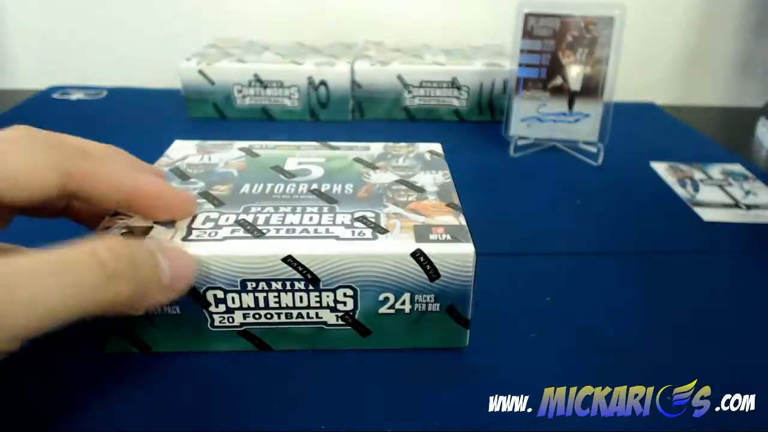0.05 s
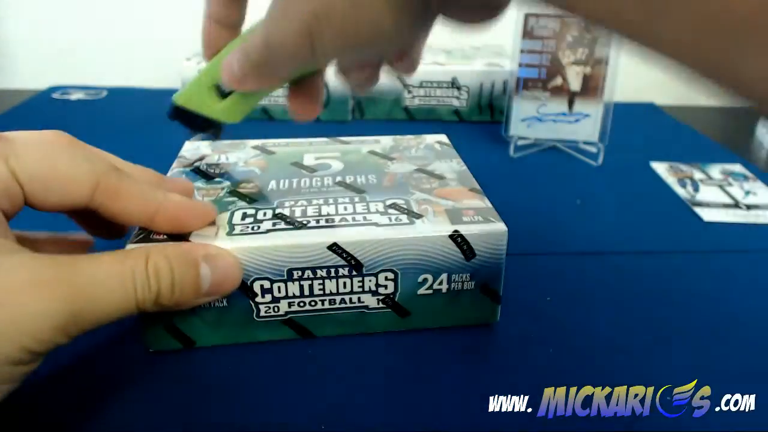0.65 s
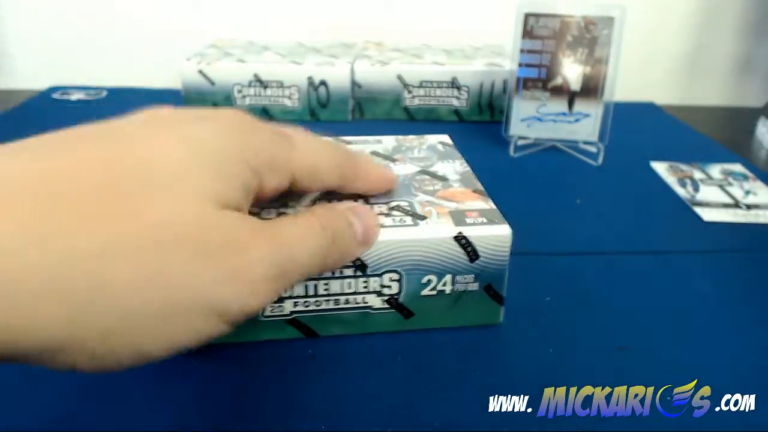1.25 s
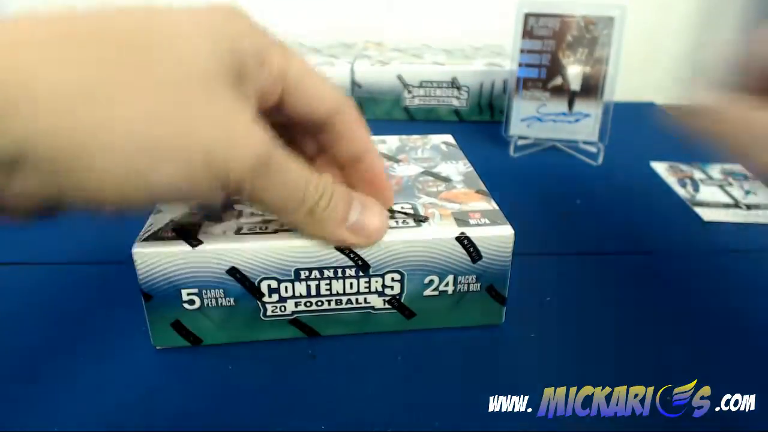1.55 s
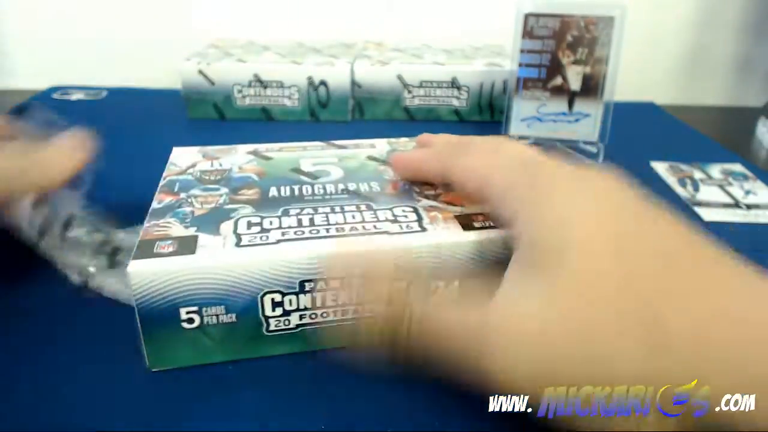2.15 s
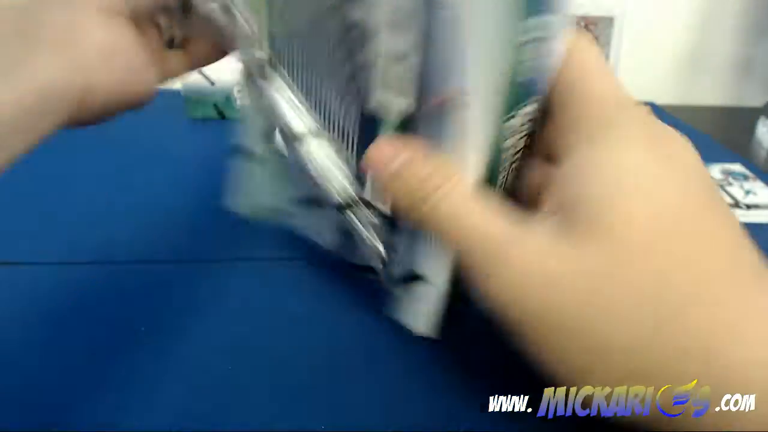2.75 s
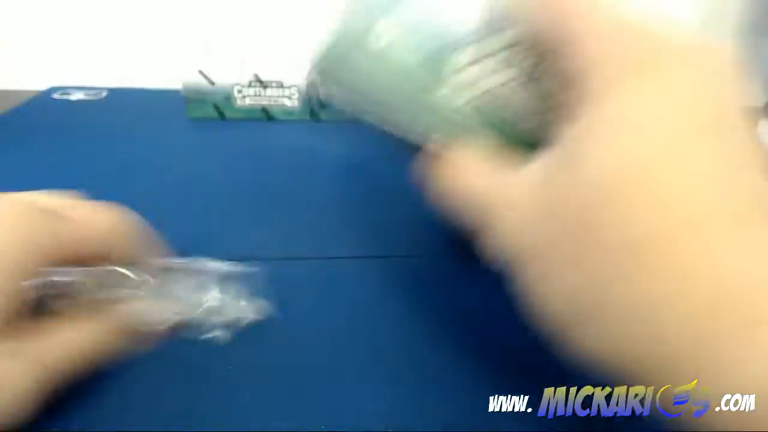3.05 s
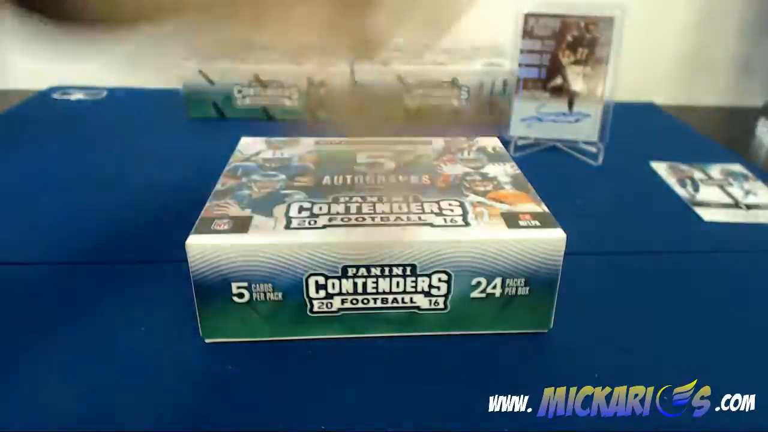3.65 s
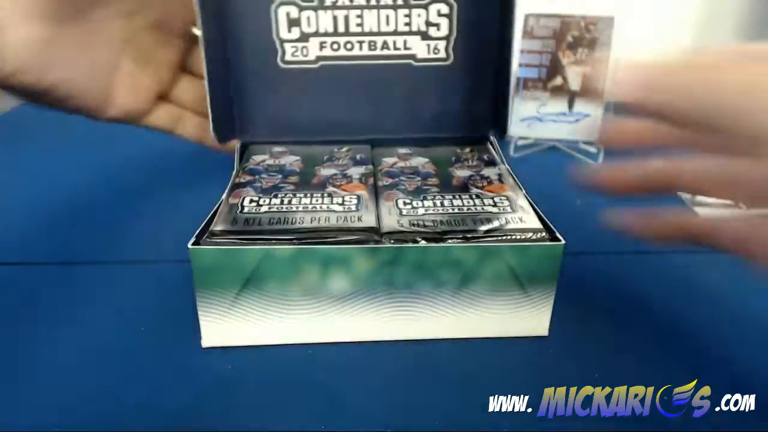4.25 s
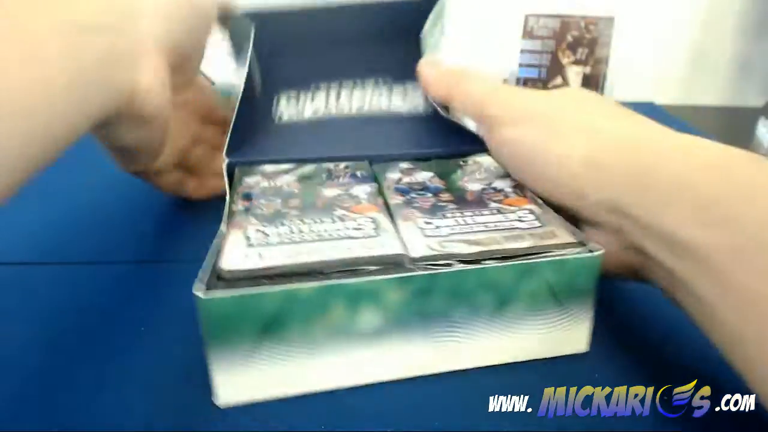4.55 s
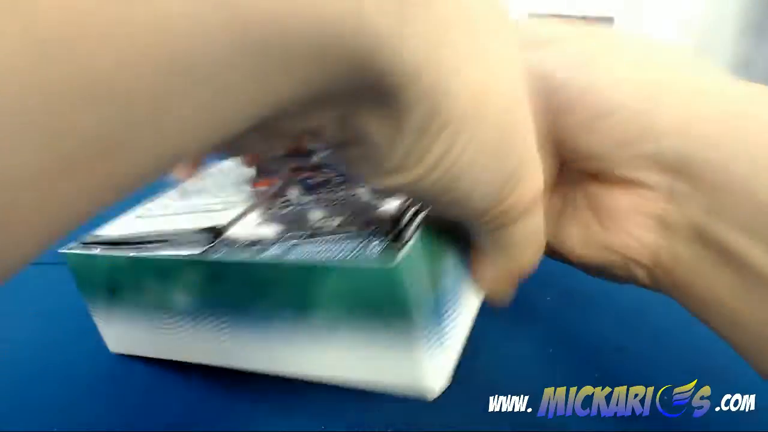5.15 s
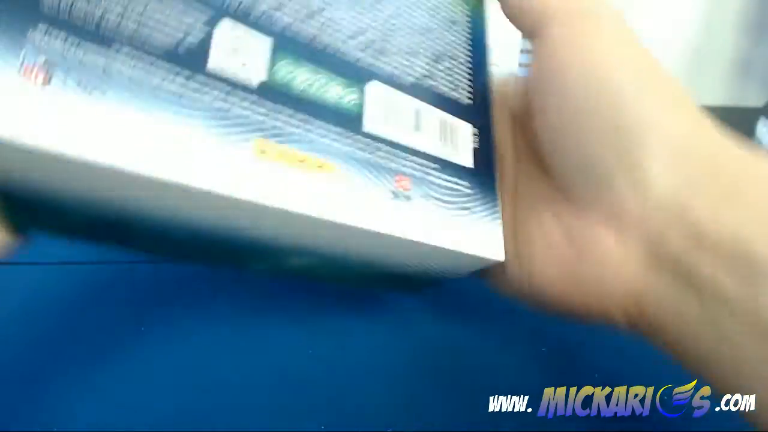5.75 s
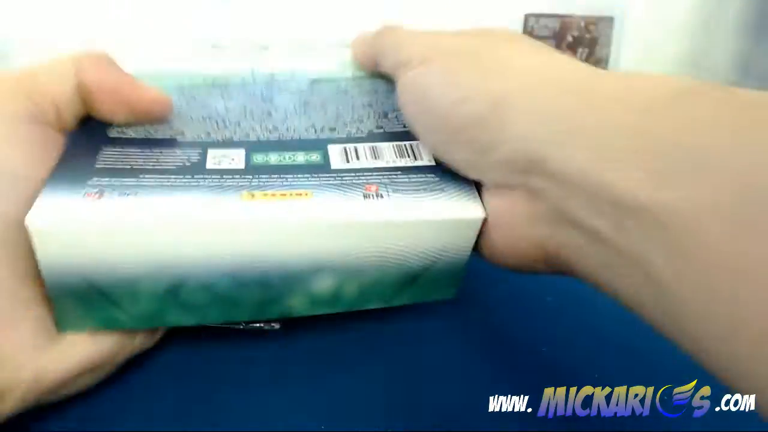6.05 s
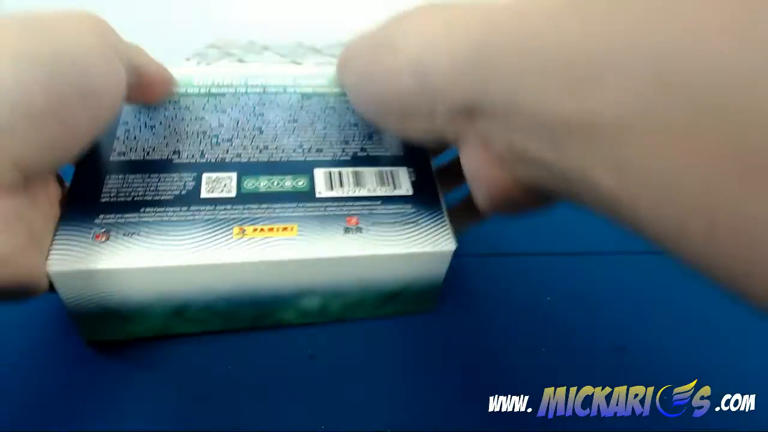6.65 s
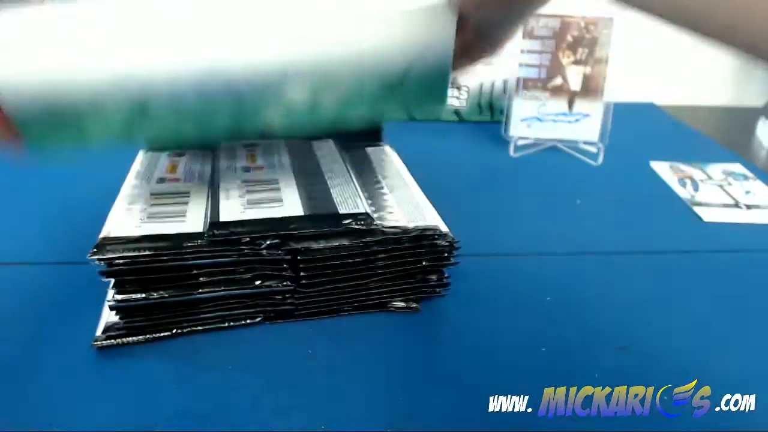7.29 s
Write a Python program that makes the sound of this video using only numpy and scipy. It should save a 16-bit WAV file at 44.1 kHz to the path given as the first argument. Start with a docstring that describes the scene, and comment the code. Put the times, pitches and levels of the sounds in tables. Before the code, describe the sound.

Hands shift on a table with low rumbles and light taps on a cardboard box. At about 0.5 seconds a cutter rasps briefly through plastic film, ending in a snap. Sharp knocks on the box follow around 1.2 to 1.4 seconds. From 1.6 to 3.4 seconds the film peels off in bright crinkles and snaps, with a deep table thump at 2.5. At about 3.2 the box drops flat with a boom, the loudest sound. The lid flaps open at 4.2 and bumps a few more times until 4.9. Foil packs then rustle and tick over low judders of handling. From 5.9 to about 7.4 seconds they slide out, scraping the cardboard and knocking hollow tones from the carton, growing lighter toward the end. The sound is mono, in a small room with little echo and a faint low background.

```python
"""A cloth-covered table in a small room, where a shrink-wrapped cardboard box is opened by a mono mic.
A cutter rasps through the film, fingers knock on the box and peel the film off in crackles and snaps,
and the box drops flat with a boom. The lid flips open and rings, the box is turned over and lifted,
and its foil packs slide out, scraping and bumping the hollow carton. Film and foil sound through
countless tiny slips and buckles; underneath, the table thumps and rumbles with the moving hands."""
import sys
import numpy as np
from scipy import signal
from scipy.fft import rfft, irfft, next_fast_len
from scipy.io import wavfile
from scipy.ndimage import uniform_filter1d

SR = 44100
rng = np.random.default_rng(int(sys.argv[2]) if len(sys.argv) > 2 else 0)


def bounce(signal):
    """Save signal as a 16-bit WAV file at the path given by the first command-line argument."""
    frames = np.transpose(np.atleast_2d(signal))
    limited = np.clip(frames, -1, 1)
    pcm = np.round(limited * 32767).astype(np.int16)
    wavfile.write(sys.argv[1], SR, pcm)


N = 331713
ROOM_TONE_DB, ROOM_SEND_DB, ROOM_T60_S = -56, -14.5, 0.22
ARM_ATTACK_S, ARM_RELEASE_T60_S = 0.011, 0.35
PULL_ATTACK_S, PULL_RELEASE_T60_S = 0.014, 0.16
SLIDE_ATTACK_S, SLIDE_RELEASE_T60_S = 0.012, 0.18
LOW_CUT_HZ, HIGH_CUT_HZ = 26, 16100

# EQ curves that give each layer its colour: frequency_hz, gain_db
ROOM_TONE_EQ = [(15, -18.5), (25, 8), (47, -5.5), (102, -13), (373, -27), (503, -25.5), (591, -27.5),
                (863, -31), (3720, -37), (5000, -38), (9840, -41), (15800, -45)]
RUMBLE_EQ = [(25, -5.5), (45, -2.5), (80, -10), (110, -9), (140, -11.5), (175, -8), (240, -17),
             (330, -20.5)]
KNOCK_EQ = [(300, -2), (700, 0), (2500, 0), (3200, -5), (4500, -4), (9000, -9), (16000, -18)]
SLIT_EQ = [(400, 3.5), (800, 3.5), (1250, 6.5), (2000, 2.5), (3000, -0.5), (6000, -8.5), (10000, -13),
           (16000, -24)]
FILM_EQ = [(400, 4.5), (1500, 1), (3500, -1), (6000, 1.5), (8000, 2), (11000, -1.5), (16000, -11)]
FOIL_EQ = [(1200, 2), (2000, -0.5), (4000, -5), (6000, -2.5), (8500, -6), (11000, -11), (16000, -21.5)]
REVERB_EQ = [(100, -14), (300, 1.5), (2500, -3.5), (8000, -6), (16000, -3.5)]
SETTLE_EQ = [(200, -2.5), (450, -12.5), (1200, -2.5), (3000, -16), (16000, -34)]
# Ringing modes of the table, of box and table together, and of the open lid: pitch_hz, gain_db, t60_s
SWAY_MODES = [(40, 4, 0.51), (50, 3.5, 0.32), (68, -3.5, 0.29)]
BOOM_MODES = [(109, 3, 0.11), (132, -22, 0.37), (171.3, -1, 0.24), (242.2, -3, 0.18), (287, -10, 0.13)]
LANDING_MODES = [(91, -7.5, 0.3), (110, 3, 0.2), (172, 3, 0.19), (200, 8, 0.078), (231, 2, 0.13),
                 (376, -8, 0.049), (456, -19, 0.036), (747, -7, 0.047), (1100, -23, 0.074)]
LID_MODES = [(182, -29, .2), (306, -7, 0.089), (480, -4.5, 0.074), (669, -4, 0.078), (977, -4.5, 0.041),
             (1036, -8, 0.085), (1400, -3.5, 0.051), (1670, 1, 0.023), (1830, 1.5, 0.028),
             (3150, -10, 0.036)]
# Resonances of the box, packed and hollow: centre_hz, width_hz, gain_db
FULL_BOX = [(515, 70, -3), (755, 55, 3), (1080, 100, 0), (1360, 100, 1), (2040, 260, 1), (2400, 280, 2),
            (2750, 200, -2), (3570, 120, -4), (5400, 500, -6)]
HOLLOW_BOX = [(258, 24, 2.5), (454, 13.5, 0.5), (516, 18.6, 3), (653, 45, 1.5), (760, 44, -2), (840, 57, 0),
              (1036, 40, -3.5)]
# Texture of the slips and buckles in each thin sheet: per_s, spread_db, grain_t60 (in s), bed (a gain)
FILM_GRAIN = dict(per_s=750, spread_db=5, grain_t60=.004, bed=.55)
FOIL_GRAIN = dict(per_s=1100, spread_db=4.5, grain_t60=.005, bed=.65)

# A hand or arm shifts on the table: start_s, length_s, rumble_db, drone_db
ARM_MOVES = [(0, 0.043, -42, -48.5), (.45, 0.36, -52, -56.5), (.81, 0.12, -48.5, -65),
             (1.11, 0.38, -45.5, -56.5), (1.5, 0.092, -44, -49.5), (1.63, 0.31, -48, -51.5),
             (1.96, 0.27, -48.5, -59), (2.24, 0.67, -47, -62), (2.55, 0.1, -35, -62),
             (2.92, 0.12, -31.5, -47), (3.33, 0.18, -42.5, -60.5), (3.55, 0.6, -55.5, -71.5),
             (4.05, 0.4, -46, -57), (4.5, 0.36, -56, -69.5), (4.8, 0.44, -41, -60.5),
             (5.15, 0.45, -46, -56.5), (5.87, 0.19, -44, -54), (6.15, .7, -55.5, -62),
             (6.38, 0.15, -42.5, -58), (7.28, 0.27, -58, -72)]
# Soft blows that reach the table: start_s, sway_db, boom_db
THUMPS = [(0.005, -39, -45), (0.461, -38.5, -54), (0.802, -41, -48.5), (1.198, -45, -37.5),
          (1.225, -44, -33.5), (1.327, -44, -26.5), (1.974, -52, -50.5), (2.028, -42, -47.5),
          (2.151, -35, -47.5), (2.493, -18, -30.5), (2.925, -32, -47), (3.077, -54, -42.5),
          (3.1504, -10.5, -42), (4.217, -37, -40), (4.796, -37, -43), (5.506, -30.5, -49.5),
          (5.873, -38, -39), (6.376, -38, -52), (6.475, -51, -52)]
# Dragged skin and cardboard stick and slip: start_s, length_s, pitch_hz, level_db
JUDDERS = [(1.123, 0.073, 50, -31), (1.269, 0.06, 172, -26.5), (2.201, 0.045, 40, -30),
           (4.925, 0.073, 54, -30), (5.002, 0.077, 45.4, -22.5), (5.066, 0.081, 50, -32),
           (5.212, 0.07, 43.4, -34), (5.516, 0.059, 43.3, -30), (6.404, 0.036, 55, -34),
           (6.487, 0.061, 61, -36)]
# Scrapes, and the box ringing on after knocks and bumps: start_s, length_s, centre_hz, width_hz, level_db
SWELLS = [(.0, 0.029, 2000, 503, -57.5), (.0, 0.052, 260, 70, -52.5), (.11, 0.024, 2200, 700, -58),
          (1.249, 0.094, 560, 300, -54.5), (1.34, .06, 550, 300, -48), (2.178, 0.032, 750, 700, -54),
          (2.935, 0.055, 188, 80, -43),  (0.571, 0.093, 1300, 330, -52), (0.582, 0.1, 1690, 300, -54),
          (0.63, 0.19, 523, 150, -54.5), (0.922, .09, 3600, 1800, -70.5), (4.25, 0.13, 1530, 600, -64.5),
          (4.398, 0.043, 1590, 400, -55.5), (4.93, 0.049, 1830, 900, -63), (4.793, 0.036, 493, 110, -41.5),
          (5.04, 0.11, 376, 60, -53.5), (5.06, .07, 2100, 500, -59), (5.05, 0.087, 207, 80, -55),
          (6.063, 0.074, 258, 60, -44.5), (5.19, 0.029, 400, 60, -50.5), (5.856, .08, 261, 70, -43.5),
          (5.96, 0.14, 1400, 400, -48), (6.207, 0.12, 880, 200, -53), (6.544, 0.062, 570, 250, -51),
          (6.702, 0.077, 4930, 600, -52.5), (6.767, 0.11, 785, 250, -49.5), (6.983, 0.18, 810, 347, -67.5),
          (7.329, 0.019, 990, 200, -52)]
# Knocks on cardboard: start_s, body_db, bite_db, crack_db
KNOCKS = [(0.054, -68, -61, -70), (0.1217, -83, -51, -64), (0.18, -89, -71, -71), (0.393, -78, -69, -72),
          (0.4634, -57, -50.5, -46.5), (1.1967, -48, -37.5, -49.5), (1.2224, -39.5, -30, -43),
          (1.3247, -26.5, -21.5, -32), (1.3512, -39.5, -39.5, -50), (1.4938, -51, -56, -72),
          (1.644, -55, -57, -72), (2.492, -46, -45, -48.5), (3.0782, -42.5, -59, -48),
          (3.1503, -31.5, -32, -38), (3.3498, -55, -58, -58), (3.417, -61.5, -71, -70),
          (4.2166, -36, -40.5, -53.5), (4.3168, -53, -58, -67), (4.4124, -53, -53, -55.5),
          (4.797, -42.5, -44.5, -47), (4.861, -49, -44, -54.5), (5.451, -57, -69, -72),
          (5.5677, -44, -38, -37), (5.5767, -45.5, -42.5, -45), (6.0739, -37, -41.5, -55),
          (6.1162, -41, -39.5, -42)]
# The box lands on one edge, then falls flat: start_s, gain_db
LANDING_HITS = [(3.1501, -21), (3.1613, -19.5)]
# The lid flaps open and bumps against its hinge: start_s, gain_db
LID_FLAPS = [(4.2177, -33.5), (4.3163, -50), (4.433, -49), (4.797, -57), (4.861, -47.5)]
# Packs bump the carton, each waking one hollow tone: start_s, knock_db, pitch_hz, ring_db
PACK_BUMPS = [(5.874, -48.5, 258, -29.5), (5.908, -45.5, 537, -32), (5.922, -56, 258, -31),
              (6.074, -47, 645, -31), (6.098, -43.5, 735, -42), (6.213, -53, 760, -42),
              (6.279, -53, 723, -39), (6.376, -57.5, 277, -52.5), (6.546, -60, 633, -37.5),
              (6.594, -57, 529, -37), (6.78, -58, 523, -43.5), (6.954, -52, 546, -40),
              (7.162, -55, 738, -48), (7.331, -45, 543, -38)]
# Packs slide on foil and cardboard: start_s, length_s, rustle_db, sizzle_db, carton_rub_db
PACK_SLIDES = [(3.75, .22, -65, -67, -64.5), (4.03, 0.18, -72, -73, -66.5), (4.25, 0.14, -70, -66.5, -67),
               (4.53, 0.05, -62.5, -67, -61.5), (4.64, 0.21, -65.5, -70, -71.5),
               (4.81, 0.051, -60, -60, -78), (4.9, 0.097, -63, -66.5, -66), (5.005, 0.11, -54, -56, -56.5),
               (5.15, 0.15, -57, -57.5, -59.5), (5.33, 0.23, -64, -66, -62), (5.645, 0.029, -70, -71, -63),
               (5.8, .07, -67.5, -70.5, -64), (5.868, 0.072, -50.5, -52.5, -43.5),
               (5.945, 0.17, -50, -51, -48.5), (6.14, 0.1, -57.5, -62, -63),
               (6.21, 0.08, -53.5, -54.5, -55), (6.35, 0.023, -56.5, -58.5, -58),
               (6.435, 0.057, -57, -57.5, -52), (6.53, 0.082, -56.5, -54.5, -47.5),
               (6.62, 0.23, -55.5, -53, -52), (6.865, 0.26, -72.5, -69, -62), (7.16, 0.014, -62, -69, -47),
               (7.25, 0.098, -61, -61, -61), (7.41, 0.05, -68.5, -68, -64)]
# Level curve of the cutter running through the film: time_s, rasp_db, hiss_db
SLIT_CURVE = [(0.533, -86, -93), (0.565, -61, -56.5), (0.605, -54, -58), (0.676, -53.5, -51),
              (0.748, -47, -49.5), (0.804, -61, -47.5), (0.836, -81, -87), (0.868, -84, -78)]
# Pulls and squeezes of the film: start_s, length_s, rustle_db, sizzle_db
FILM_PULLS = [(1.64, 0.081, -58, -54.5), (1.71, 0.21, -51, -46), (1.955, 0.021, -52, -50.5),
              (2.015, 0.15, -63, -59.5), (2.125, 0.084, -58, -60), (2.26, .23, -63, -58),
              (2.485, .15, -58, -53), (2.635, 0.17, -54, -49), (2.805, 0.12, -61, -56),
              (2.9, 0.12, -54, -50.5), (3.045, 0.05, -56.5, -56.5), (3.19, 0.089, -62, -62.5),
              (3.255, 0.091, -55, -48), (3.36, 0.058, -75, -66.5), (3.46, 0.29, -68.5, -68)]
# The sharpest creases of film or foil snap: start_s, middle_db, treble_db
SNAPS = [(0.7998, -51, -41.5), (1.1194, -58, -66), (1.242, -47, -46.5), (1.5547, -62.5, -56),
         (1.577, -72, -61), (1.6083, -64, -58.5), (1.6608, -60, -51), (1.8053, -57, -37),
         (1.8643, -44.5, -43), (1.9, -39, -45), (1.9041, -40.5, -32), (1.915, -46, -36.5),
         (1.9674, -46, -46.5), (2.0274, -55.5, -53), (2.3764, -73, -52), (2.5846, -53.5, -51),
         (2.6712, -46, -49), (2.694, -50, -42), (2.7474, -39.5, -41), (2.7673, -44.5, -43),
         (3.201, -66, -54), (3.267, -49, -63), (4.431, -46, -47.5), (4.7625, -60, -72), (4.8182, -40, -44),
         (5.086, -53, -53), (5.254, -48.5, -44.5), (5.2975, -51, -54), (5.837, -55.5, -66),
         (5.909, -46, -51.5), (5.964, -63, -50), (6.099, -38, -43), (6.1295, -43.5, -44),
         (6.1464, -52, -46.5), (6.182, -46, -53), (6.2127, -44, -44.5), (6.2794, -43, -47),
         (6.285, -50, -48), (6.445, -52, -55), (6.4739, -51, -45), (6.545, -56, -49), (6.571, -50, -43.5),
         (6.9522, -54, -53), (7.1814, -54, -59)]


def from_db(db):
    return 10 ** (np.asarray(db) / 20)


def rms_one(x):
    return x / np.sqrt(np.mean(x ** 2) + 1e-20)


def attack_one(x, length_s):
    """Scale a hit to rms 1 over its opening."""
    return x / np.sqrt(np.mean(x[:int(length_s * SR)] ** 2) + 1e-20)


def seconds(length_s):
    return np.arange(int(length_s * SR)) / SR


def fade(t, t60):
    return np.exp(-np.log(1000) * t / t60)


def add(out, start_s, sound):
    """Mix a sound in at its cue."""
    start = max(0, round(start_s * SR))
    out[start:start + len(sound)] += sound[:N - start]


def band(x, low_hz, high_hz=SR):
    sos = signal.butter(3, [low_hz, min(high_hz, .45 * SR)], "band", fs=SR, output="sos")
    return signal.sosfilt(sos, x + 1e-18)


def colour(x, eq):
    """Minimum-phase EQ, so nothing rings ahead of a transient."""
    size = 2 * next_fast_len(len(x) // 2 + 2048)
    hz, db = np.transpose(eq)
    bin_db = np.interp(np.log(np.fft.rfftfreq(size, 1 / SR) + 1), np.log(hz), db)
    cepstrum = irfft(np.log(from_db(bin_db)), size)
    cepstrum[1:size // 2] *= 2
    cepstrum[size // 2 + 1:] = 0
    return irfft(rfft(x, size) * np.exp(rfft(cepstrum)), size)[:len(x)]


def resonate(x, resonances):
    """A bank of parallel resonators of alternating polarity."""
    out = 0
    for k, (hz, width_hz, db) in enumerate(resonances):
        r = np.exp(-np.pi * width_hz / SR)
        poles = [1, -2 * r * np.cos(2 * np.pi * hz / SR), r * r]
        gain = (-1) ** k * from_db(db) * (1 - r * r) / 2
        out = out + gain * signal.lfilter([1, 0, -1], poles, x + 1e-18)
    return out


def ring(modes, t, scatter_db):
    """Struck modes; every hit shares its force among them a little differently."""
    return sum(from_db(db + scatter_db * rng.standard_normal()) * fade(t, t60)
               * np.sin(2 * np.pi * hz * t) for hz, db, t60 in modes)


def strokes(rows, attack_s, release_t60):
    """Hand movements swell, hold and die away; one envelope for each level column."""
    powers = np.zeros((len(rows[0]) - 2, N))
    for start_s, length_s, *levels_db in rows:
        t = seconds(length_s + release_t60)
        shape = np.minimum(t / attack_s, 1) * fade(np.maximum(t - length_s, 0), release_t60)
        for power, db in zip(powers, levels_db):
            add(power, start_s, (from_db(db) * shape) ** 2)
    return np.sqrt(powers)


def moving_hands(x, share, per_s):
    """Reflections off the moving hands and box comb the sound with drifting delays."""
    out, n = x, np.arange(N)
    for delay_s in (.00035, .0008, .0017):
        knots = rng.standard_normal(400)
        drift = uniform_filter1d(np.interp(n / SR * per_s, np.arange(len(knots)), knots), size=1500)
        lag = np.round(delay_s * SR * np.exp(0.27 * drift)).astype(int)
        out = out + share * x[np.clip(n - lag, 0, N - 1)]
    return out


def grain_energy(sizes, per_s, t60):
    """Energy envelope of grains that fire at random and die away."""
    hits = sizes * (rng.random(N) < per_s / SR)
    return signal.lfilter([1], [1, -fade(1 / SR, t60) ** 2], hits ** 2 + 1e-12)


def crackle(per_s, spread_db, grain_t60, bed):
    """Tiny slips and buckles of uneven size, each a short burst, over a smooth bed of friction."""
    sizes = from_db(spread_db * np.minimum(rng.exponential(1, N), 3.5))
    energy = grain_energy(sizes, per_s, grain_t60)
    energy /= uniform_filter1d(energy, size=2200) + 1e-9
    return np.sqrt(energy + bed ** 2) * rng.standard_normal(N)


def stray_creases(per_s, size_db, spread_db, grain_t60):
    """Now and then a small crease gives way and ticks above the rustle."""
    sizes = from_db(size_db + spread_db * rng.uniform(-0.88, 1, N))
    return np.sqrt(grain_energy(sizes, per_s, grain_t60)) * rng.standard_normal(N)


def facets(per_s, spread_db, q):
    """Small facets of a crumpled sheet flip over, each ringing briefly at its own pitch."""
    sizes = from_db(spread_db * np.minimum(rng.exponential(1, N), 3))
    flips = sizes * (rng.random(N) < per_s / SR)
    pitches_hz = np.geomspace(1200, 13000, num=14)
    choice = rng.integers(0, len(pitches_hz), N)
    out = sum(resonate(flips * (choice == k), [(hz, hz / q, 0)]) for k, hz in enumerate(pitches_hz))
    return out / np.sqrt(np.abs(uniform_filter1d(out ** 2, size=3000)) + 1e-9)


def rustle(folds, creases, grains, eq, low_hz, split_hz):
    """A thin sheet radiates its grains; broad folds sound below the split, sharp creases above."""
    sheet = colour(moving_hands(grains, share=.17, per_s=5), eq)
    return folds * rms_one(band(sheet, low_hz, split_hz)) + creases * rms_one(band(sheet, split_hz))


def room_tone():
    """A quiet, steady bed of bass-heavy noise."""
    return from_db(ROOM_TONE_DB) * rms_one(colour(rng.standard_normal(N), ROOM_TONE_EQ))


def room_reverb(x):
    """Diffuse reflections of a small furnished room, duller than the direct sound."""
    t = seconds(0.46)
    tail = rng.standard_normal(len(t)) * fade(t, ROOM_T60_S) * (t > .006)
    tail = colour(tail, REVERB_EQ)
    return signal.fftconvolve(x, tail / np.sqrt(np.sum(tail ** 2)))[:N]


def arm_rumble():
    """Shifting hands and arms make the table rumble and the box drone."""
    shuffle = colour(rng.standard_normal(N), RUMBLE_EQ)
    rumble, drone = strokes(ARM_MOVES, ARM_ATTACK_S, ARM_RELEASE_T60_S)
    return rumble * rms_one(band(shuffle, 24.1, 65.3)) + drone * rms_one(band(shuffle, 70.7, 354))


def table_thumps():
    """Soft blows set off the table's deep sway and the boom above it."""
    out, t = np.zeros(N), seconds(.6)
    soft_onset = 1 - fade(t, t60=0.013)
    for start_s, sway_db, boom_db in THUMPS:
        sway = attack_one(ring(SWAY_MODES, t, scatter_db=1), 0.0087)
        boom = attack_one(ring(BOOM_MODES, t, scatter_db=3), 0.049)
        add(out, start_s, (from_db(sway_db) * sway + from_db(boom_db) * boom) * soft_onset)
    return out


def judders():
    """Stick-slip builds a short low tone that dies when the drag stops."""
    out = np.zeros(N)
    for start_s, length_s, hz, db in JUDDERS:
        t = seconds(length_s)
        add(out, start_s, from_db(db) * signal.windows.tukey(len(t), .6) * np.sin(2 * np.pi * hz * t))
    return out


def resonant_swells():
    """Short resonant swells of noise: scrapes, and the box ringing on after knocks and bumps."""
    out = np.zeros(N)
    grains = crackle(per_s=1400, spread_db=3.5, grain_t60=0.0006, bed=0.84)
    for start_s, length_s, hz, width_hz, db in SWELLS:
        burst = grains[round(start_s * SR):][:int(length_s * SR)]
        swell = rms_one(band(resonate(burst, [(hz, width_hz, 0)]), hz / 2, hz * 2))
        add(out, start_s, from_db(db) * swell * signal.windows.tukey(len(swell), .6))
    return out


def knocks():
    """A hard contact cracks, shakes the contents briefly and rings the panels of the full box."""
    out, t = np.zeros(N), seconds(.2)
    bands_hz = [(300, 1400), (1400, 3500), (3500, 16500)]  # body, bite, crack
    for start_s, *levels_db in KNOCKS:
        contact = rng.standard_normal(len(t)) * (fade(t, t60=0.019) + from_db(-7) * fade(t, t60=0.068))
        panel = colour(resonate(contact, FULL_BOX) + 0.43 * contact, KNOCK_EQ)
        for db, edges_hz in zip(levels_db, bands_hz):
            add(out, start_s, from_db(db) * attack_one(band(panel, *edges_hz), 0.0068))
    return out


def box_landing():
    """The full box falls on the table and both ring together while the packs inside settle."""
    out, t = np.zeros(N), seconds(.7)
    for start_s, db in LANDING_HITS:
        boom = ring(LANDING_MODES, t, scatter_db=4) * (1 - fade(t, t60=0.004))
        settle = rms_one(colour(rng.standard_normal(len(t)), SETTLE_EQ)) * fade(t, t60=0.13)
        add(out, start_s, from_db(db) * (boom + from_db(-15) * settle))
    return out


def lid_flaps():
    """The open lid is a free panel and rings briefly at every stop."""
    out, t = np.zeros(N), seconds(.25)
    for start_s, db in LID_FLAPS:
        add(out, start_s, from_db(db) * ring(LID_MODES, t, scatter_db=2.5))
    return out


def carton_rub():
    """Sliding packs rub the cardboard and the hollow box resonates."""
    grains = crackle(per_s=440, spread_db=1, grain_t60=0.004, bed=0.26)
    cavity = moving_hands(resonate(grains, HOLLOW_BOX) + 0.099 * grains, share=0.22, per_s=4.4)
    *_, pressure = strokes(PACK_SLIDES, SLIDE_ATTACK_S, SLIDE_RELEASE_T60_S)
    return pressure * rms_one(band(cavity, 306, 1080))


def carton_bumps():
    """A pack knocks on the carton walls and the air inside answers with a hollow note."""
    out, t = np.zeros(N), seconds(.25)
    for start_s, knock_db, hz, ring_db in PACK_BUMPS:
        contact = rng.standard_normal(len(t)) * fade(t, t60=0.027)
        walls = attack_one(band(resonate(contact, HOLLOW_BOX), 380, 1450), 0.0047)
        air = ring([(hz, ring_db, .11)], t, scatter_db=1.5) * (1 - fade(t, t60=0.0071))
        add(out, start_s, from_db(knock_db) * walls + air)
    return out


def cutter():
    """The blade slits the film in dense, tiny slips: a fine rasp topped with hiss."""
    blade = crackle(per_s=5200, spread_db=2, grain_t60=0.0033, bed=0.66)
    times_s, *curves_db = np.transpose(SLIT_CURVE)
    t = np.arange(N) / SR
    rasp, hiss = (from_db(np.interp(t, times_s, db, left=-200, right=-200)) for db in curves_db)
    return rustle(rasp, hiss, blade, SLIT_EQ, low_hz=400, split_hz=3700)


def film_peel():
    """Each pull buckles the film into a bright crinkle with stray ticks."""
    crinkle = crackle(**FILM_GRAIN) + .35 * facets(per_s=1200, spread_db=3.5, q=8)
    ticks = stray_creases(per_s=20, size_db=9, spread_db=3, grain_t60=.012)
    folds, creases = strokes(FILM_PULLS, PULL_ATTACK_S, PULL_RELEASE_T60_S)
    return rustle(folds, creases, crinkle + ticks, FILM_EQ, low_hz=400, split_hz=3170)


def foil_packs():
    """The packs rustle and tick as they slide over each other and the cardboard."""
    ticks = stray_creases(per_s=24, size_db=10, spread_db=6, grain_t60=0.045)
    folds, creases, _ = strokes(PACK_SLIDES, SLIDE_ATTACK_S, SLIDE_RELEASE_T60_S)
    return rustle(folds, creases, crackle(**FOIL_GRAIN) + ticks, FOIL_EQ, low_hz=1120, split_hz=3300)


def crease_snaps():
    """A crease gives way with a sharp click: film at first, duller foil once the packs slide."""
    out, t = np.zeros(N), seconds(.04)
    first_slide_s = PACK_SLIDES[0][0]
    for start_s, middle_db, treble_db in SNAPS:
        eq = FILM_EQ if start_s < first_slide_s else FOIL_EQ
        click = colour(rng.standard_normal(len(t)) * fade(t, t60=0.027), eq)
        middle = attack_one(band(click, 800, 4470), 0.0045)
        treble = attack_one(band(click, 6340), 0.0056)
        add(out, start_s, from_db(middle_db) * middle + from_db(treble_db) * treble)
    return out


def scene():
    """Wrapping, cardboard and low end, mixed to mono with a touch of reverb over the room tone."""
    wrapping = cutter() + film_peel() + foil_packs() + crease_snaps()
    cardboard = resonant_swells() + knocks() + lid_flaps() + carton_rub() + carton_bumps()
    low_end = table_thumps() + arm_rumble() + judders() + box_landing()
    handling = wrapping + cardboard + low_end
    return (room_tone() + handling + from_db(ROOM_SEND_DB) * room_reverb(handling))[None]


def record(dry):
    """The microphone loses the deepest bass; the top is cut steeply."""
    thinned = signal.sosfilt(signal.butter(2, LOW_CUT_HZ, "high", fs=SR, output="sos"), dry)
    return signal.sosfilt(signal.ellip(10, .1, 80, HIGH_CUT_HZ, fs=SR, output="sos"), thinned)


dry = scene()
out = record(dry)
bounce(out)
```